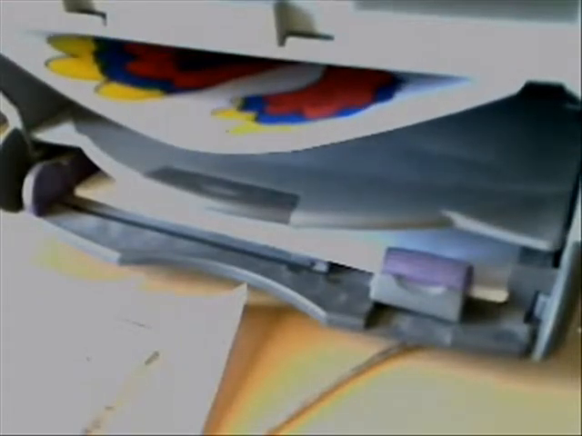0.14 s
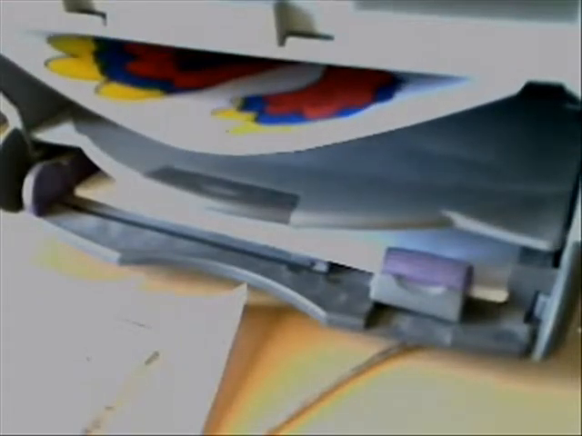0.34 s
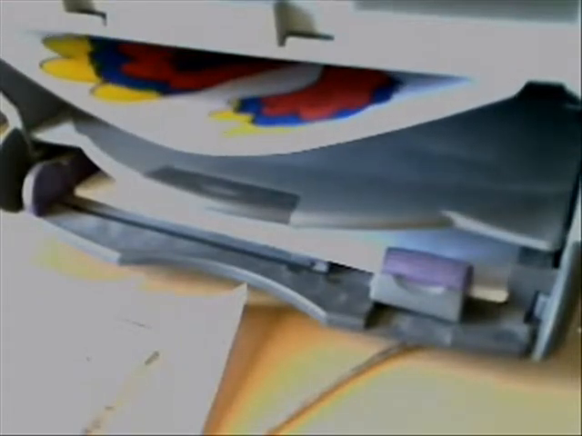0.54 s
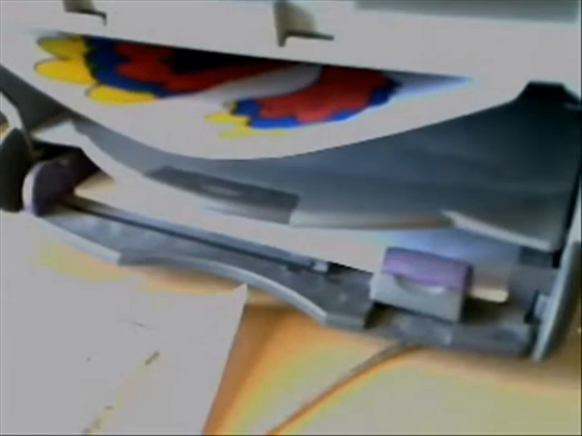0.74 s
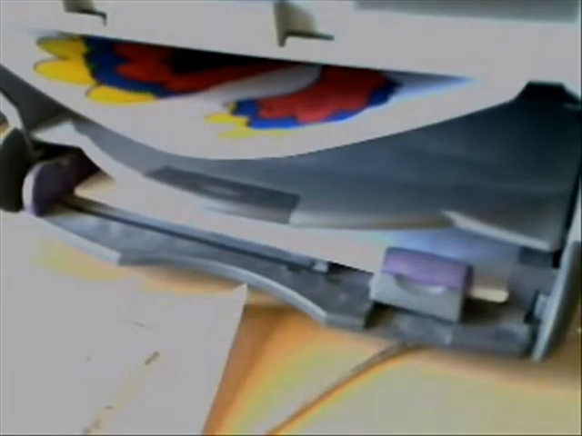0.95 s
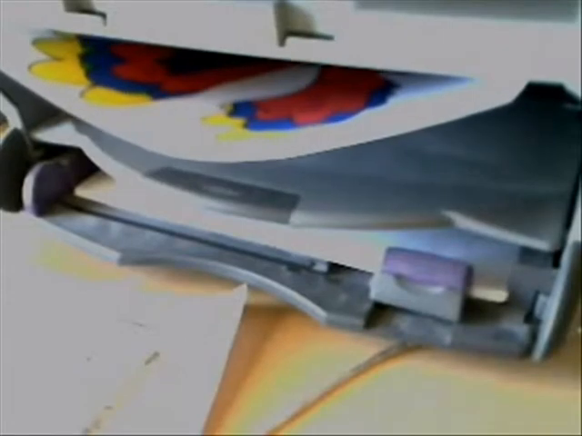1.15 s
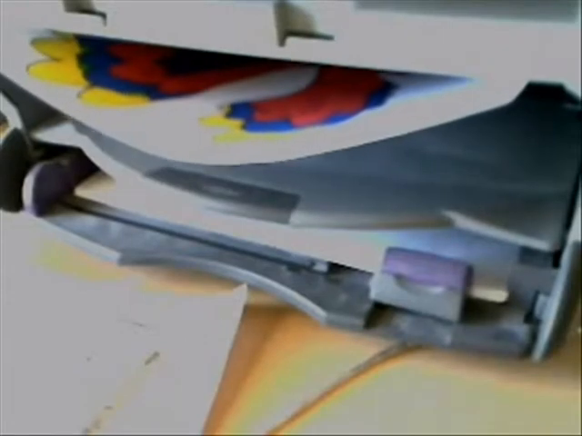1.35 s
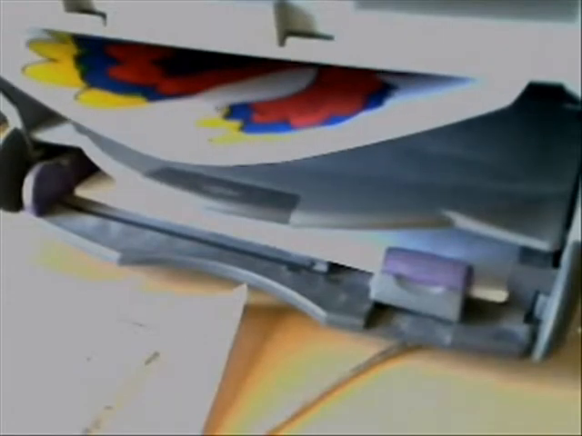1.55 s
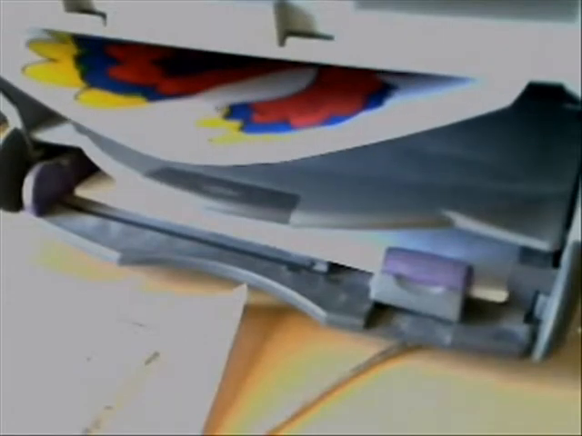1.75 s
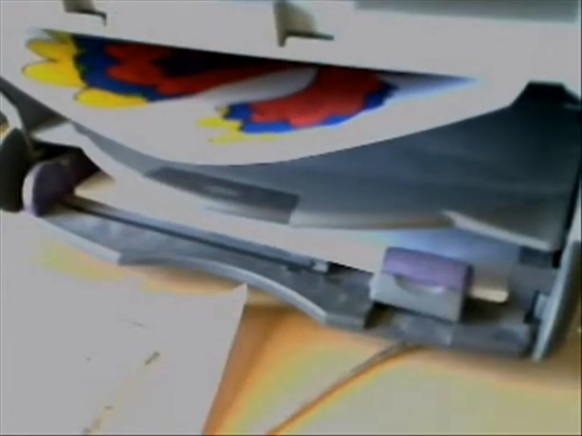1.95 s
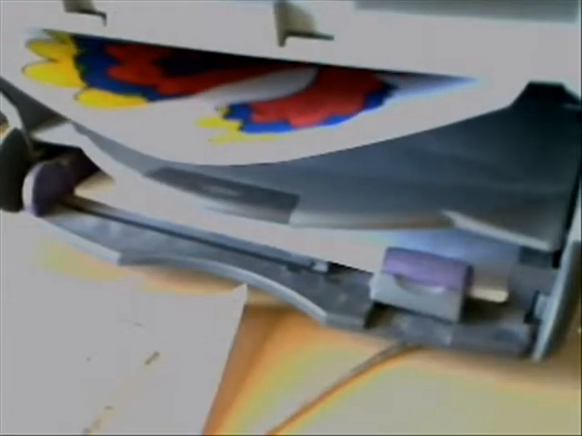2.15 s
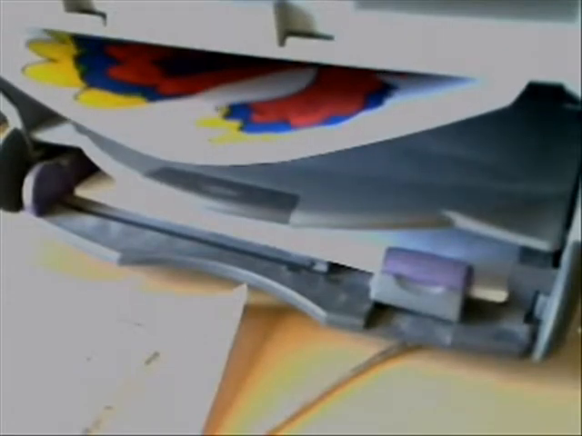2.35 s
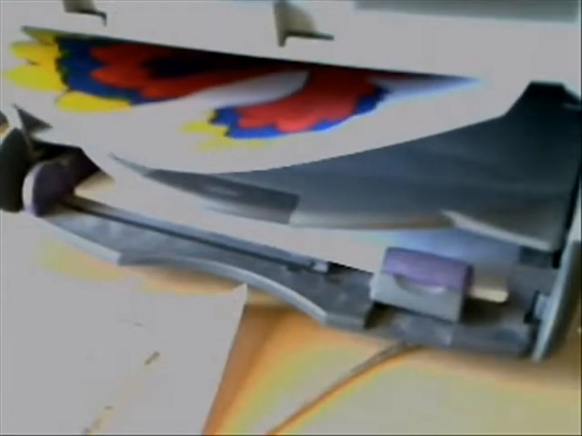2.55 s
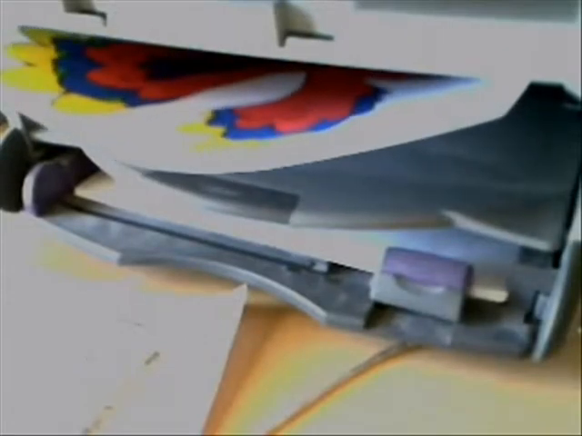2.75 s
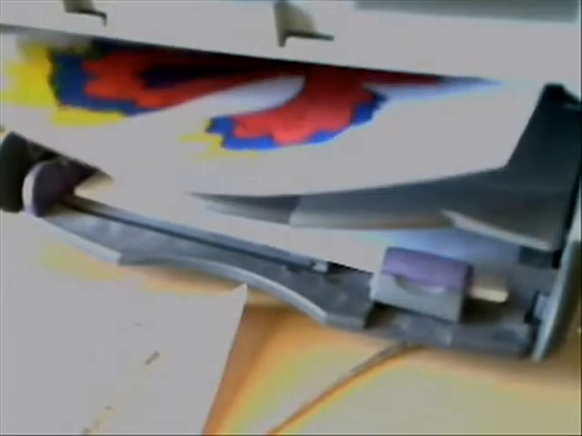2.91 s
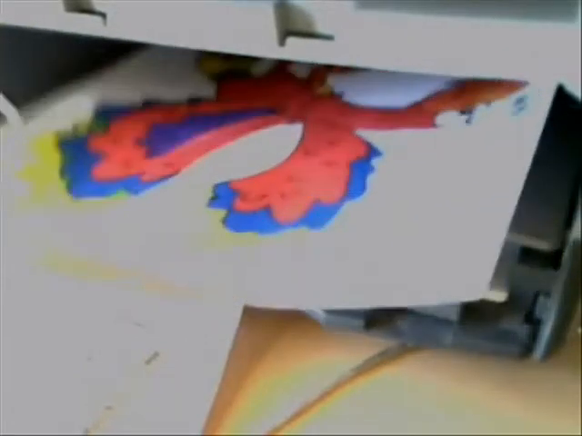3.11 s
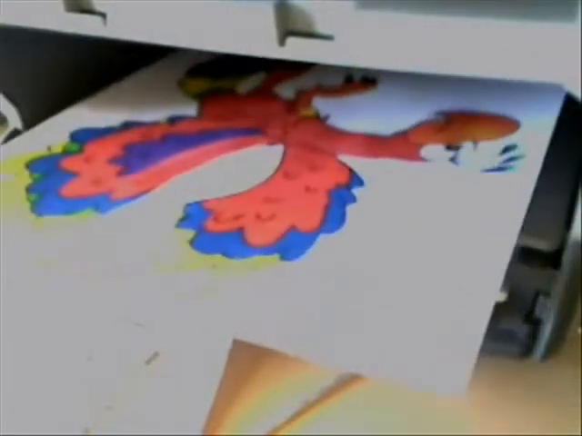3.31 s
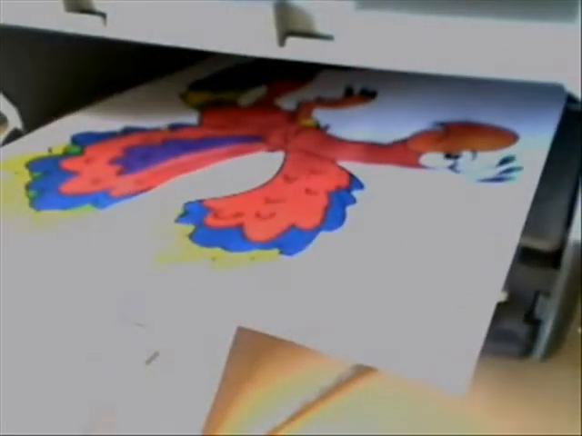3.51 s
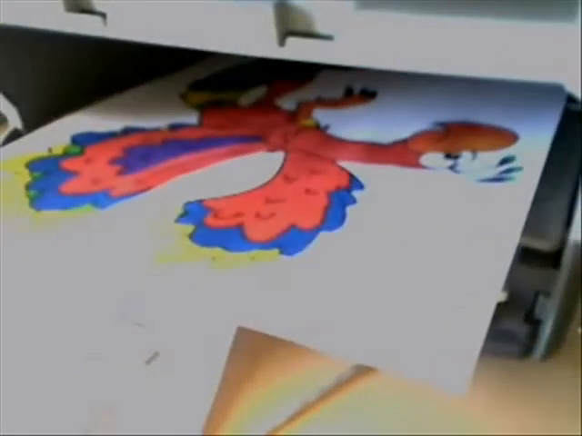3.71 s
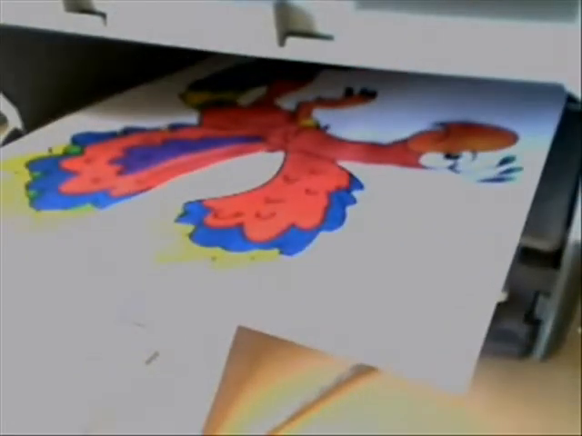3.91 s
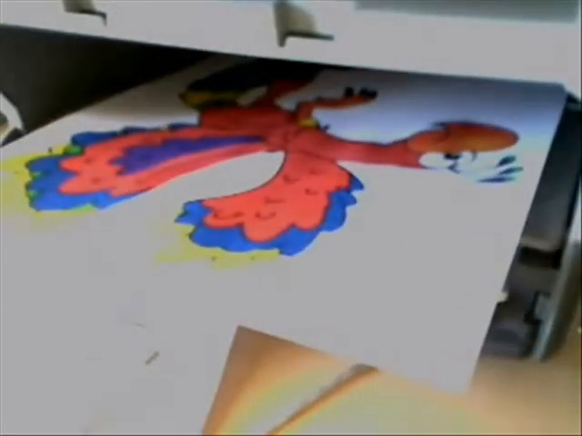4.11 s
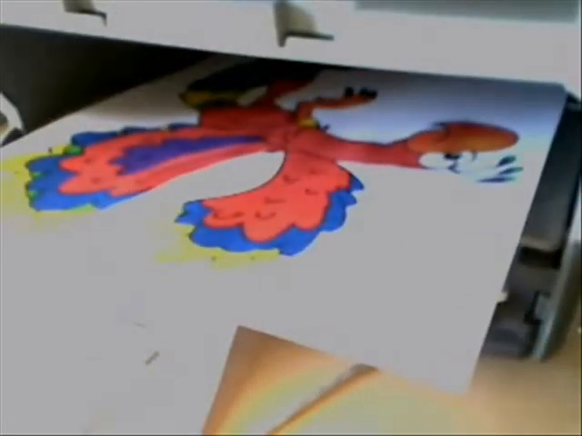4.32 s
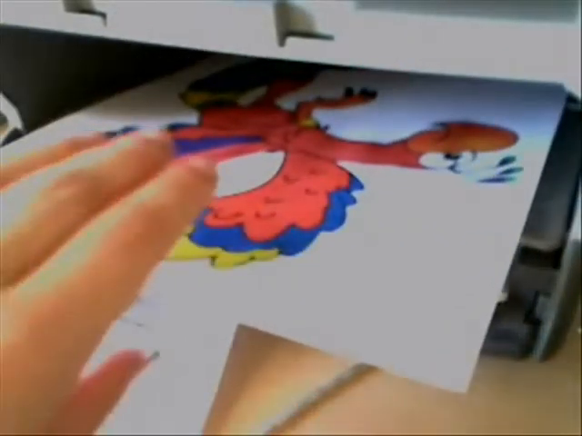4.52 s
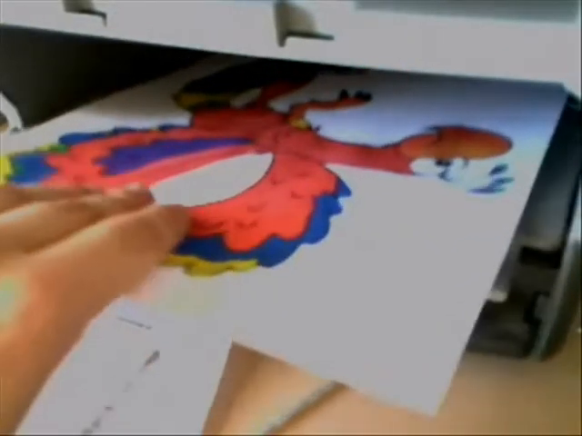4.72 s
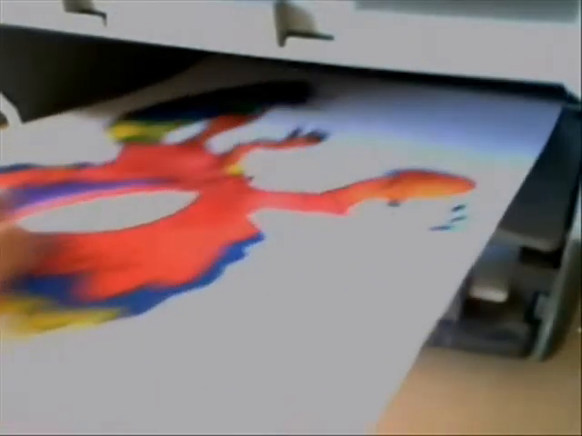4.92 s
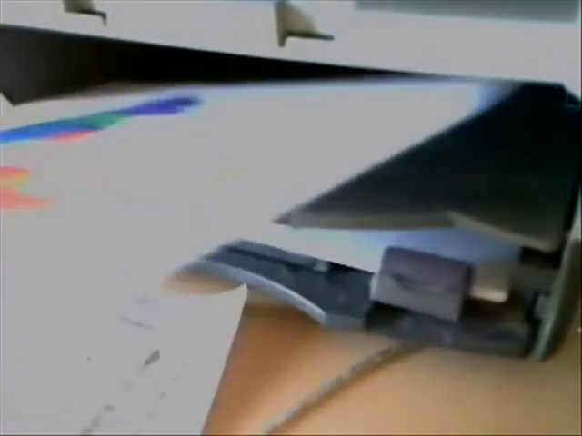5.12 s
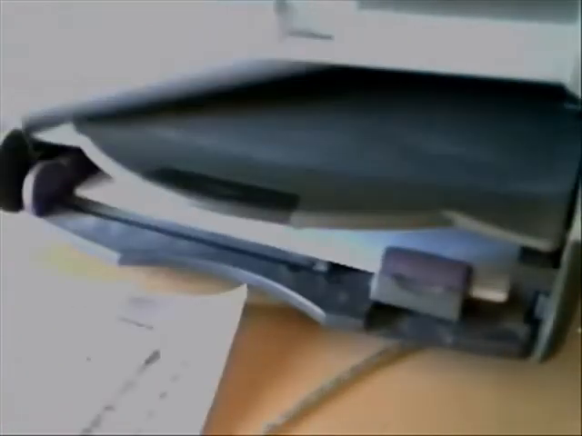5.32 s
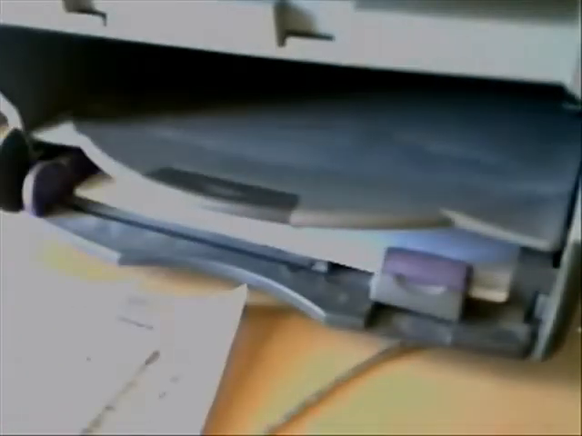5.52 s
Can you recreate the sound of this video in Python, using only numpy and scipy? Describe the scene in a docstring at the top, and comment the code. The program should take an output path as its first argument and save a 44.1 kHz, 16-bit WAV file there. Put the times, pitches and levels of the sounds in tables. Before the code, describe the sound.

An inkjet printer swishes and chatters through its last passes, clacks loudly twice ejecting the page, then a hand scrapes the sheet away.

```python
"""An inkjet printer finishes a page on a desk, close to the microphone: filtered noise swishes with each head pass,
sines sing for the nozzles, and tooth-modulated noise chatters as the rollers step the paper on.
The motor groans and drones at a resonance of the plastic case; the eject mechanism clacks loudly twice, as noise
bursts and decaying modes, and the sheet hisses onto the tray. A hand slides it out, its edge scraping in grainy
noise. A soft rush with unsteady hum lines runs throughout, and a small room answers."""
import sys
import numpy as np
from scipy import signal
from scipy.fft import rfft, irfft, next_fast_len
from scipy.io import wavfile
from scipy.ndimage import map_coordinates

SR = 44100
rng = np.random.default_rng(int(sys.argv[2]) if len(sys.argv) > 2 else 0)


def put_to_file(sound):
    """Save the sound as 16-bit audio at rate SR, in the file named by the first command-line argument."""
    columns = np.atleast_2d(sound).T  # one column per channel
    safe = np.clip(columns, -1, 1)
    whole_steps = np.round(safe * 32767)
    wavfile.write(sys.argv[1], SR, whole_steps.astype(np.int16))


N = 245194
T = np.arange(N) / SR  # time [s]

# colour of a hard, bright contact, for knocks and taps: (frequency [Hz], relative level [dB per Hz])
CRACK_SPECTRUM = [(530, -35), (900, -13), (1430, 1.5), (2170, -1), (3300, 1), (3800, -3), (4820, -4.5),
                  (5770, -9.5), (8440, -15.5), (15500, -27)]


def carriage(ramp=0.038):
    """The head swishes along its rail and eases off between passes; its bearing whistles and the belt whirs."""
    # passes of the head: (start [s], length [s], relative level [dB])
    passes = [(0.165, 0.31, -47.5), (0.508, 0.3, -50), (0.843, 0.26, -51.5), (1.176, 0.24, -57.5),
              (1.485, 0.29, -59), (1.763, 0.276, -56.5), (2.032, 0.193, -56), (2.22, 0.22, -56)]
    # colour of the rail: (frequency [Hz], relative level [dB per Hz])
    rail_spectrum = [(1060, -46), (1800, -39), (2190, -17), (2700, -8.5), (2980, -8), (3260, -3.5),
                     (3600, -8), (4240, -5.5), (4590, -6.5), (5120, -7), (9280, -21), (12500, -19),
                     (15500, -26)]
    # the slide bearing whistles here and there: (start [s], length [s], frequency [Hz], level [dB])
    whistles = [(0.349, 0.073, 3080, -47), (0.553, 0.077, 3060, -45), (1.039, 0.035, 3040, -50),
                (1.204, 0.088, 2990, -50.5), (1.65, 0.087, 3000, -56), (1.792, 0.091, 2850, -55)]
    # colour of the belt drive: (frequency [Hz], relative level [dB per Hz])
    belt_spectrum = [(35, -48), (60, -12.5), (176, -4), (422, -9.5), (456, -24), (517, -8), (695, -18.5),
                     (826, -9.5), (1640, -23), (2500, -22.5), (3250, -61), (5500, -120)]

    travel = sum(amp(db) * move(s, length, ramp) for s, length, db in passes)
    travel = travel + amp(-63.5) * move(0.115, 1.7, ramp)  # the belt rubs on through the earlier turns
    rubbing = friction(rail_spectrum, rate=2800, grainy=0.36) + amp(-8.5) * whistle(4250, width=370)
    swish = travel * amp(1.06 * wobble(35)) * rubbing
    bearing = sum(amp(db) * swell(s, length) * whistle(hz, width=240) for s, length, hz, db in whistles)
    # already running when we listen in, then dying away slowly
    belt_gain = amp(-47.5) * burst(-0.15, rise=0.32, length=3.4, t60=3.2)
    belt = belt_gain * friction(belt_spectrum, rate=500, grainy=0.2)
    return swish + bearing + belt


def nozzles():
    """Ink fires in short swells; the second and, stronger, third harmonics of the firing rate carry."""
    # firing in mid-pass: (start [s], length [s], firing rate [Hz], relative level [dB])
    firings = [(0.281, 0.078, 4065, -54), (0.609, 0.052, 3970, -47), (0.968, 0.049, 4030, -51),
               (1.253, 0.067, 3970, -49.5)]
    out = np.zeros(N)
    for s, length, hz, db in firings:
        unsteady_hz = hz * (1 + 0.004 * wobble(50) + 0.005 * wobble(900))
        phase = 2 * np.pi * np.cumsum(unsteady_hz) / SR
        tone = np.sin(3 * phase) + amp(-10.0) * np.sin(2 * phase)
        out += amp(db + 4.5) * swell(s, length) * tone
    return out


def rollers(tooth_hz=450, lag=0.016):
    """Each move spins the gears up and down: teeth chatter with the speed, the paper path rumbles lag s later."""
    # roller moves: (start [s], length [s], ramp [s], relative level [dB])
    feeds = [(0.414, .043, 0.01677, -25.5), (0.753, .046, 0.01773, -25.5), (1.077, .046, 0.01632, -26.5),
             (1.398, .043, 0.01535, -26.5), (2.422, 0.188, 0.01361, -30.5), (2.611, .05, 0.01168, -30.5),
             (2.715, .034, 0.00577, -24), (2.99, .43, 0.02022, -55.5), (3.405, .06, 0.025, -31)]
    # colour of the gears: (frequency [Hz], relative level [dB per Hz])
    gear_spectrum = [(59, -40), (100, -2), (233, -0.5), (429, -10.5), (589, -3.5), (977, -7.5),
                     (1160, -4.5), (2090, -11), (2470, -3), (4100, -4.5), (4460, -7.5), (7560, -13),
                     (9540, -23), (12000, -20), (15500, -29)]
    # colour of the paper path: (frequency [Hz], relative level [dB per Hz])
    path_spectrum = [(80, -16.5), (150, 0.5), (260, 1.5), (420, -0.5), (750, -3), (1300, 3), (2200, -3.5),
                     (5000, -32)]

    speed = sum(move(s, length, ramp) for s, length, ramp, db in feeds)
    gain = sum(amp(db) * move(s, length, ramp) for s, length, ramp, db in feeds)
    tooth_phase = 2 * np.pi * np.cumsum(speed * tooth_hz * (1 + 0.088 * wobble(60))) / SR
    gear_ring = whistle(3850, width=2100)  # the gear wheels ring near 4 kHz
    meshing = friction(gear_spectrum, rate=2200, grainy=0.48) + amp(-3.0) * gear_ring
    teeth = gain * unit((1 + 0.42 * np.sin(tooth_phase)) * meshing)
    rumble = np.interp(T - lag, T, gain) * friction(path_spectrum, rate=2300, grainy=0.74)
    return amp(-1.7) * teeth + amp(-12.0) * rumble


def boom(case_hz=175, glide_hz=110, settle=0.0337, desk_hz=72):
    """The motor rings the lowest resonance of the case: short pushes groan down onto it, a load holds it."""
    # the motor speeds up or brakes and shakes the case:
    # (start [s], length [s], relative groan level [dB], desk thump level [dB])
    pushes = [(0.476, 0.039, -31, -53), (0.816, 0.055, -33.5, -44.5), (1.144, 0.062, -36, -52),
              (1.461, 0.046, -39, -56), (1.752, 0.052, -34, -55), (2.017, 0.071, -42.5, -67),
              (2.213, 0.047, -35, -42)]
    # the motor drones under load: (start [s], length [s], t60 [s], relative level [dB])
    drones = [(2.426, 0.068, .1, -27.5), (2.732, .05, .42, -17), (2.878, .115, .4, -19),
              (3.07, .045, .1, -30.5), (3.135, .03, .7, -47.5), (3.485, .035, .15, -26),
              (3.597, 0.014, .3, -34), (3.73, 0.073, .4, -45)]
    # colour of the shaken case: (frequency [Hz], relative level [dB per Hz])
    shake_spectrum = [(40, -42), (70, -8.5), (110, -9), (160, 3), (230, 1), (330, -2), (450, -36.5),
                      (900, -51)]

    shake = friction(shake_spectrum, rate=560, grainy=0.2)
    desk = whistle(desk_hz, width=12)
    out = np.zeros(N)
    for s, length, db, desk_db in pushes:
        fast = np.exp(-(np.maximum(T - s, 0) / settle) ** 4)  # 1 at the start, 0 once settled
        # the belt jerks, so the groan is never a clean tone
        waver = 0.42 * wobble(130)  # [radians]
        groan = np.sqrt(2) * np.sin(2 * np.pi * np.cumsum(case_hz + glide_hz * fast) / SR + waver)
        # the case answers less while the motor is above its resonance
        case = amp(1.0 - 11.0 * fast + 1.0 * wobble(40.06)) * groan + amp(-7.0) * shake
        out += amp(db) * burst(s, rise=0.02, length=length, t60=0.25) * case
        out += amp(desk_db) * swell(s, 0.11) * desk
    # the case takes 0.03 s to ring up
    load = sum(amp(db) * burst(s, 0.03, length, t60) for s, length, t60, db in drones)
    ring = np.sqrt(2) * np.sin(2 * np.pi * case_hz * T + 0.25 * wobble(24.98))
    return out + load * (amp(-3.0 + 0.9 * wobble(40)) * ring + amp(-10.0) * shake)


def knocks(body_t60=0.095, body_rise=0.0016, desk_hz=48):
    """Plastic parts strike: a bright crack, the thud of the panels, the ring of the case, a bump in the desk."""
    # blows: (time [s], relative crack level [dB], relative body level [dB], treble tilt [dB per octave],
    # crack rise [s], crack t60 [s])
    blow_list = [(2.7399, -19, -17, 2.5, 0.00038, 0.055), (2.763, -33.5, -27, -5.5, .001, 0.026),
                 (2.808, -44, -37, -10, 0.006, 0.061), (2.877, 0.5, -22.5, 6, 0.0049, 0.06),
                 (2.884, -2, -7, 5.5, 0.00092, 0.015), (2.94, -14, -27, 5.5, 0.0019, .1),
                 (3.008, -16.5, -38, -2.5, .002, 0.12), (3.094, -23.5, -34.5, -2, 0.002, 0.049),
                 (3.453, 3, -11, 8.5, 0.003, 0.04), (3.463, 1.5, -9, 4.5, 0.001, 0.025),
                 (3.603, -27, -25, -2.5, 0.0035, 0.078), (3.62, -43, -30, -6, .004, .04),
                 (3.643, -21, -28.5, 5, 0.005, 0.061)]
    # colour of the panels: (frequency [Hz], relative level [dB per Hz])
    body_spectrum = [(24, -50.5), (40, -23.5), (127, -15), (218, -2), (480, 0), (612, 2.5), (764, -6.5),
                     (1120, -3), (1400, -15), (1550, -15), (1680, -10.5), (2960, -19.5), (3620, -18.5),
                     (3920, -24.5), (5000, -31.5), (6500, -57.5), (11000, -120)]
    # modes of the case: (frequency [Hz], relative level [dB], t60 [s])
    case_modes = [(215, -7.5, 0.26), (268, -7, 0.36), (377.3, -8.5, 0.16), (431, -20, 0.1),
                  (581.7, 0, 0.17), (622, -5.5, .16), (880, -8.5, 0.13), (1316, -7.5, 0.2),
                  (1637, -17, 0.24)]

    out, t = np.zeros(N + SR), np.arange(SR // 2) / SR
    for s, crack_db, body_db, tilt_db, rise, t60 in blow_list:
        crack = coloured(rng.standard_normal(len(t)), CRACK_SPECTRUM, tilt_db)
        crack = crack * amp(-60 * t / t60) * (1 - np.exp(-t / rise))
        thud = coloured(rng.standard_normal(len(t)), body_spectrum) * amp(-60 * t / body_t60)
        ring = np.zeros(len(t))
        for hz, db, life in case_modes:
            decay = amp(db + rng.normal(0, 1.43) - 60 * t / life)  # each blow excites the modes a little differently
            ring += decay * np.sin(2 * np.pi * (hz * t + rng.random()))
        bump = np.sin(2 * np.pi * desk_hz * t) * amp(-60 * t / 0.028)
        body = amp(3.0) * thud + amp(-4.0) * ring + amp(-10) * bump
        body = body * (1 - np.exp(-t / body_rise))
        out[round(s * SR):][:len(t)] += amp(crack_db) * crack + amp(body_db) * body
    return out[:N]


def rattle():
    """Dense contacts of loose plastic parts around the clacks, and a thin panel buzzing with them."""
    # (start [s], length [s], chatter level [dB], panel buzz level [dB])
    rattles = [(2.885, 0.083, -24.5, -39), (3.002, 0.038, -34.5, -34), (3.402, .04, -29.5, -47),
               (3.458, 0.037, -29, -29), (3.632, 0.015, -43, -44)]
    # colour of the loose parts: (frequency [Hz], relative level [dB per Hz])
    loose_spectrum = [(260, -25.5), (450, 0), (591, -7), (884, -9), (1480, -6.5), (1670, -11.5),
                      (1810, -15.5), (2350, -11.5), (2990, -15), (3310, -11), (3810, -13.5), (4260, -13.5),
                      (5000, -18), (6500, -53), (11000, -120)]
    chatter = friction(loose_spectrum, rate=750, grainy=0.39)
    panel = whistle(1480, width=320)
    out = np.zeros(N)
    for s, length, db, buzz_db in rattles:
        out += burst(s, 0.018, length, t60=0.23) * (amp(db) * chatter + amp(buzz_db) * panel)
    return out


def paper():
    """The sheet hisses as it slides; its edge sticks and slips on the tray while its resonance sinks."""
    # the sheet glides out of the rollers: (start [s], length [s], relative level [dB])
    glides = [(3.108, 0.12, -34), (3.31, .028, -51.5)]
    # colour of the glide: (frequency [Hz], relative level [dB per Hz])
    glide_spectrum = [(290, -33.5), (500, -18), (577, -5.5), (716, -11.5), (1150, -11.5), (1960, -13),
                      (2540, 1), (4250, 2), (6450, -8), (7030, -15), (15500, -30)]
    # the hand draws the sheet off the tray: (start [s], rise [s], length [s], relative level [dB])
    pulls = [(4.65, 0.25, 0.27, -45), (4.928, 0.032, 0.14, -34.5), (5.208, .012, 0.039, -42)]
    # colour of the drawn sheet: (frequency [Hz], relative level [dB per Hz])
    sheet_spectrum = [(530, -26), (900, -12), (1330, -18), (1950, -12), (2150, -14), (2690, -12.5),
                      (3220, -6), (3890, -5), (4390, -1.5), (4940, -2.5), (5910, -9), (7860, -11),
                      (9740, -18), (11800, -11.5), (15500, -19)]
    # the edge catches: (start [s], length [s], then relative levels of rasp [dB], hiss [dB], flex [dB])
    scrapes = [(5.245, 0.094, -24, -25, -42), (5.412, 0.057, -28.5, -47, -35)]
    # colour of each scrape's rasp, one list per scrape: (frequency [Hz], relative level [dB per Hz])
    rasp_spectra = [
        [(88, -55), (150, -39), (248, -5), (334, -25), (499, -1.5), (561, -17), (755, 4), (882, -10),
         (1270, -7.5), (1820, 0.5), (3300, -15), (4290, -37), (7260, -120)],
        [(59, -44.5), (100, -10.5), (227, -5), (352, -7), (538, -6.5), (605, -10.5), (980, -10), (1040, -18.5),
         (1130, -9), (1610, -5.5), (2290, -17), (3300, -23.5), (4290, -29), (7260, -120)],
    ]
    # colour of the edge's hiss: (frequency [Hz], relative level [dB per Hz])
    edge_spectrum = [(1650, -23), (2800, -11.5), (3520, -4.5), (3730, -7), (4430, -1), (5730, -16),
                     (6470, -16), (7100, -20.5), (8800, -12.5), (10800, -27.5), (12400, -24),
                     (15500, -32.5)]
    flex_hz, flex_fall, flex_width = 2000, 11, 340  # start [Hz], fall [octaves per s], width [Hz]
    rasp_sag = 18  # [dB per s]

    glide = sum(amp(db) * burst(s, 0.026, length, t60=0.17) for s, length, db in glides)
    pull = sum(amp(db) * burst(s, rise, length, t60=0.12) for s, rise, length, db in pulls)
    flutter = amp(3 * wobble(70))  # the free sheet flutters as it glides
    slide = glide * flutter * friction(glide_spectrum, rate=1300, grainy=0.3)
    slide = slide + pull * friction(sheet_spectrum, rate=3000, grainy=0.39)

    scrape, edge = np.zeros(N), friction(edge_spectrum, rate=1200, grainy=0.32)
    for (s, length, rasp_db, hiss_db, flex_db), colour in zip(scrapes, rasp_spectra):
        age = np.maximum(T - s, 0)
        # the sheet's resonance sinks as it unbends: slow noise carried on a falling sine
        flex_phase = 2 * np.pi * np.cumsum(flex_hz * 2 ** (-flex_fall * age)) / SR
        flex = np.sqrt(2) * whistle(0, width=flex_width) * np.sin(flex_phase)
        rasp = amp(rasp_db) * friction(colour, rate=900, grainy=0.4) + amp(flex_db) * flex
        # the rasp bites at once and slackens
        scrape += burst(s, 0.0036, length, t60=0.16) * amp(-rasp_sag * age) * rasp
        # the hiss grows with speed and stops as the edge lifts
        scrape += burst(s, 0.0443, length, t60=0.071) * amp(hiss_db) * edge
    return amp(-1.0) * slide + amp(-0.5 + 1.3 * wobble(130)) * scrape


def taps(tray_t60=0.13, tray_rise=0.0011):
    """A dry paper tick, and the hollow answer of the thin tray."""
    # fingers, then the sheet's edge, land on the tray:
    # (time [s], tick level [dB], treble tilt [dB per octave], tick t60 [s], tray level [dB])
    landings = [(4.702, -32.5, -1, 0.045, -30), (4.775, -31, 1, 0.019, -34), (4.802, -63, -2, .02, -39.5),
                (5.245, -17, 2, 0.025, -18), (5.377, -28, -9, 0.032, -36.5),
                (5.421, -30.5, -5.5, 0.014, -33), (5.448, -23.5, -9, 0.013, -35),
                (5.468, -27.5, -8, .012, -33.5)]
    # colour of the tray: (frequency [Hz], relative level [dB per Hz])
    tray_spectrum = [(120, -37), (200, -3), (390, -4.5), (580, 11), (720, -11), (853, -0.5), (1390, -5.5),
                     (1660, -22.5), (1800, -21), (2020, -16), (3000, -18), (3900, -44), (6600, -120)]
    out, t = np.zeros(N + SR), np.arange(SR // 2) / SR
    for s, tick_db, tilt_db, t60, tray_db in landings:
        tick = coloured(rng.standard_normal(len(t)), CRACK_SPECTRUM, tilt_db) * amp(tick_db - 60 * t / t60)
        tray = coloured(rng.standard_normal(len(t)), tray_spectrum) * amp(tray_db - 60 * t / tray_t60)
        out[round(s * SR):][:len(t)] += tick + tray * (1 - np.exp(-t / tray_rise))
    return out[:N]


def idle():
    """The idle machine and the room: a soft rush of noise with hum lines unsteady in level and phase."""
    # colour of the rush: (frequency [Hz], relative level [dB per Hz])
    rush_spectrum = [(15, -72), (25, -50.5), (50, -16), (110, -6), (389, -9.5), (421, -4), (469, -14),
                     (666, -13.5), (762, -15), (871, -14), (1050, -17.5), (1410, -16), (2300, -27),
                     (15500, -49.5)]
    # hum lines: (frequency [Hz], relative level [dB])
    hum_lines = [(118.4, -59), (425.3, -57), (656.8, -61), (850.6, -64)]
    lines = np.zeros(N)
    for hz, db in hum_lines:
        lines += amp(db + 1.4 * wobble(8.3)) * np.sin(2 * np.pi * hz * T + 0.57 * wobble(14))
    rush = coloured(rng.standard_normal(N), rush_spectrum)
    return amp(-51.0) * rush + amp(1.0) * lines


def room(x):
    """A small room's answer: a noise tail, 5 ms late, that dies sooner in the treble."""
    # (frequency [Hz], t60 [s])
    decay_times = [(150, 0.94), (1500, 0.27), (5000, 0.27), (14000, 0.14)]
    hz, t, z = signal.stft(rng.standard_normal(SR // 2), SR, nperseg=256)
    decay = amp(-60 * t / along(decay_times, hz)[:, None])
    tail = signal.istft(z * decay, SR, nperseg=256)[1]
    tail = np.pad(tail / np.linalg.norm(tail), (SR // 200, 0))
    return signal.fftconvolve(x, tail)[:N]


def amp(db):
    """Decibels to gain."""
    return 10 ** (np.asarray(db) / 20)


def unit(x):
    """x at rms 1."""
    return x / np.sqrt(np.mean(x ** 2) + 1e-20)


def along(points, hz):
    """(Hz, value) points read on a log frequency axis."""
    f, v = np.transpose(points)
    return np.interp(np.log(hz + 1), np.log(f + 1), v)


def wobble(rate):
    """A smooth random curve, rate knots a second."""
    return map_coordinates(rng.standard_normal(int(N * rate / SR) + 4), [T * rate])


def filtered(x, response):
    """x times a function of frequency, padded so that the end does not wrap onto the start."""
    m = next_fast_len(len(x) + 8192)
    return irfft(rfft(x, m) * response(np.fft.rfftfreq(m, 1 / SR)), m)[:len(x)]


def coloured(x, spectrum, tilt_db=0):
    """x with the given spectrum, tilted per octave above 450 Hz, at rms 1."""
    def response(hz):
        return amp(along(spectrum, hz) + tilt_db * np.log2(np.maximum(hz, 450)))
    return unit(filtered(x, response))


def friction(spectrum, rate, grainy):
    """Tiny random slips, about rate a second, over a smooth rush; grainy is their share of the power."""
    slips = unit((rng.random(N) < rate / SR) * rng.standard_normal(N))
    share = np.clip(grainy, 0, 1)
    return coloured(np.sqrt(share) * slips + np.sqrt(1 - share) * rng.standard_normal(N), spectrum)


def whistle(centre_hz, width):
    """Noise caught in one resonance, width in Hz, at rms 1."""
    return unit(filtered(rng.standard_normal(N), lambda hz: 1 / (1 + (2 * (hz - centre_hz) / width) ** 2)))


def swell(s, length):
    """A smooth bump from s on."""
    return np.sin(np.pi * np.clip((T - s) / length, 0, 1)) ** 2


def move(s, length, ramp):
    """Speed of a motor move: ramp up, hold, ramp down."""
    return np.clip(np.minimum(T - s, s + length - T) / ramp, 0, 1)


def burst(s, rise, length, t60):
    """Gain that rises from s; from s + length on it dies away."""
    return np.clip((T - s) / rise, 0, 1) * amp(-60 * np.maximum(T - s - length, 0) / t60)


def scene():
    """The printer close by, with a little of the room around its blows and running noise."""
    blows = knocks() + taps() + rattle()
    running = carriage() + nozzles() + rollers() + paper()
    reverb = room(amp(-17.5) * blows + amp(-19) * running)
    return (idle() + boom() + running + blows + reverb)[None]


def record(dry):
    """The loudest clacks softly overload the microphone; nothing passes above 16 kHz."""
    clipped = dry[0] / (1 + np.abs(dry[0]) ** 6) ** (1 / 6)
    return filtered(clipped, lambda hz: hz < 16000)[None]


dry = scene()
out = record(dry)
put_to_file(out)
```